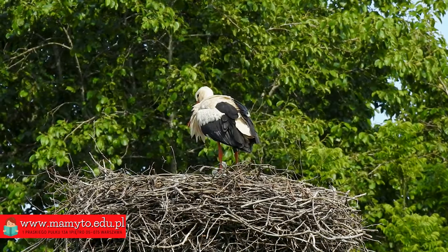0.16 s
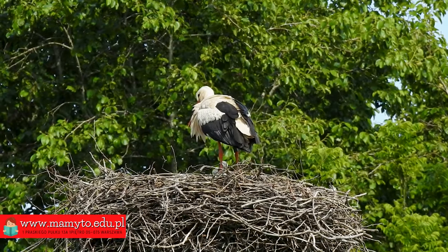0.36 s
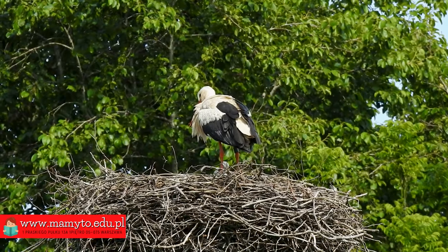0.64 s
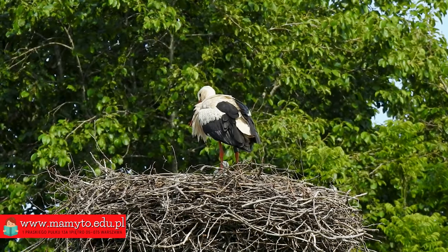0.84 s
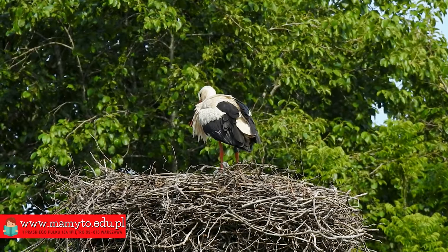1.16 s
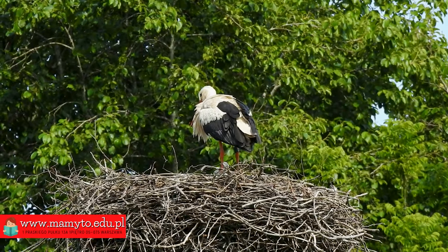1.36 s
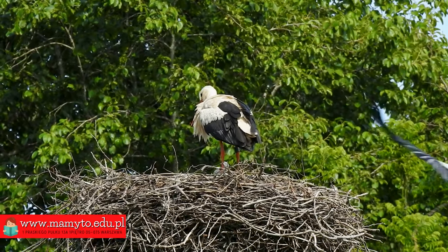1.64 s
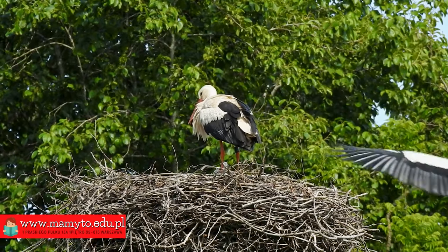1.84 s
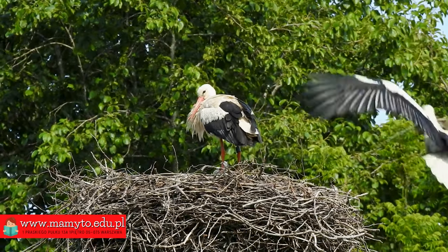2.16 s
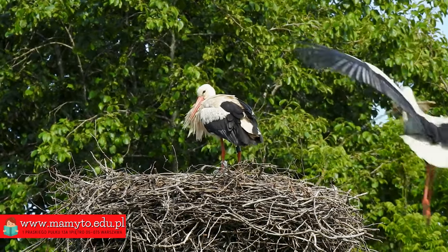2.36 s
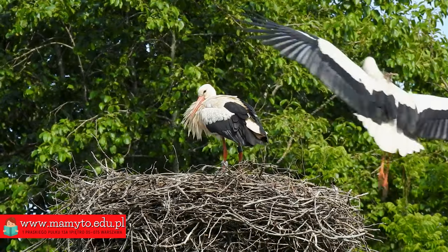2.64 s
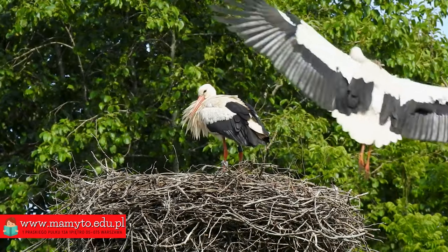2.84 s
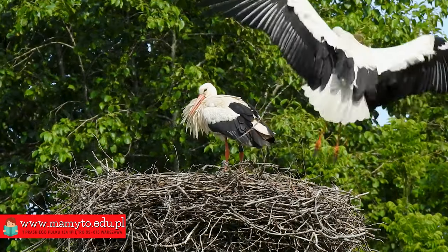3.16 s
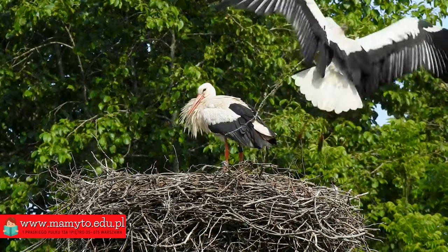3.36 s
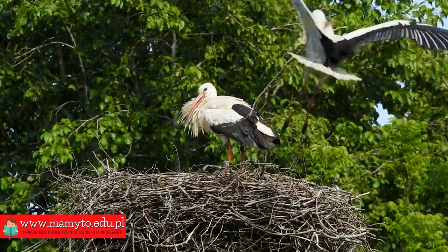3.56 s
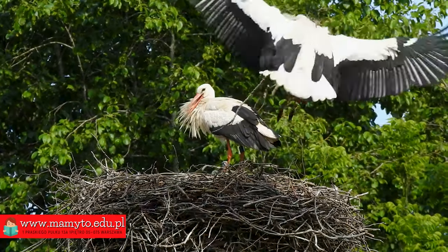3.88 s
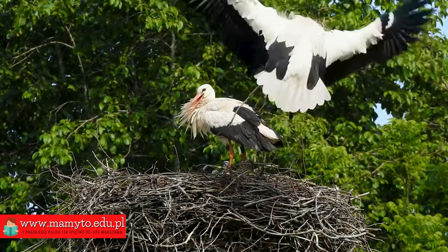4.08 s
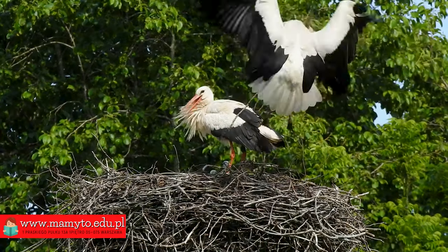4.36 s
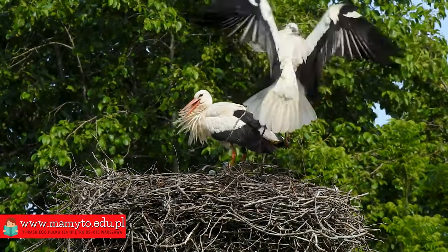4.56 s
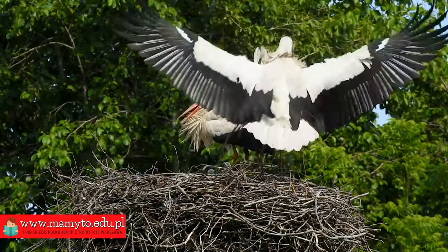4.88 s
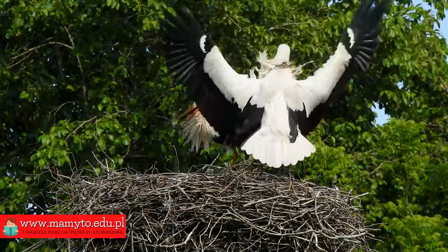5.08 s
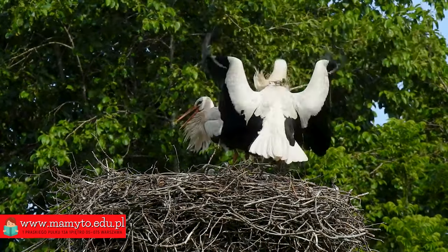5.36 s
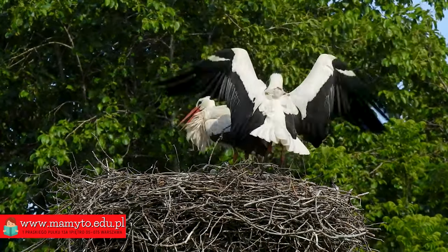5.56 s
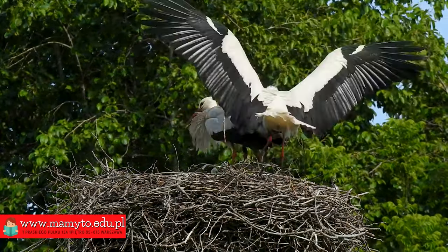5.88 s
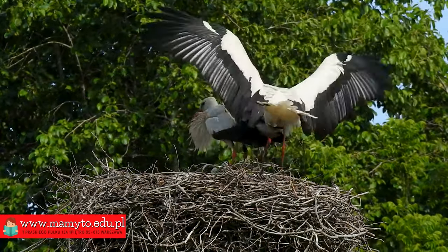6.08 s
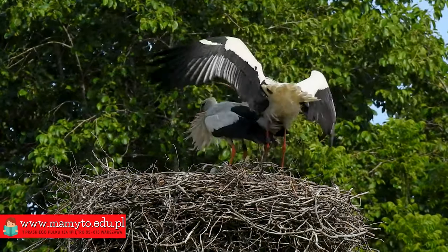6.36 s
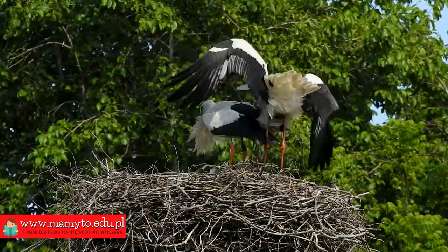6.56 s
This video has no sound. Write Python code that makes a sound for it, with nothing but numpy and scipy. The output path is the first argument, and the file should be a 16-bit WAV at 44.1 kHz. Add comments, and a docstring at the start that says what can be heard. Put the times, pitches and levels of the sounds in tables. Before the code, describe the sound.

Outdoors by a leafy wood, two storks on a stick nest begin bill-clattering almost together, quietly and very fast. The clacks grow louder and settle into a steady hollow rattle, the softer bird slower and out of step. A far dove coos faintly, a tiny bird whistles, and light wind stirs leaves. The louder stork speeds up at the end. The microphone hears both birds centred and fairly clear.

```python
"""Two storks start clattering their bills almost together on a stick nest, each at its own pace.
Every clack rings bill and throat pouch, modelled as resonances that shift as the neck bends.
Wind gusts rumble and leaf noise swells; nest and trees return each clack as scattered noise tails.
From 1.9 s a dove coos far off (gliding sines); a small bird whistles at 2.5 s and again from 4.3 s.
The mate has slowed by then; the lead stork speeds up from 6 s and clatters on to the end."""
import sys
import numpy as np
from scipy import signal
from scipy.fft import rfft, irfft
from scipy.io import wavfile
from scipy.ndimage import uniform_filter1d, minimum_filter1d

SR = 44100
rng = np.random.default_rng(int(sys.argv[2]) if len(sys.argv) > 2 else 0)


def bounce(signal):
    """Save signal as a 16-bit WAV file at the path given by the first command-line argument."""
    frames = np.transpose(np.atleast_2d(signal))
    limited = np.clip(frames, -1, 1)
    pcm = np.round(limited * 32767).astype(np.int16)
    wavfile.write(sys.argv[1], SR, pcm)


N = 296352
TIME = np.arange(N) / SR

# bill and pouch resonances per neck posture: centre_hz, half_power_width_hz, relative_level_db
LEAD_POSTURE_0 = [(704, 148, -12), (944, 130, -10), (1520, 113, 11.5), (2146, 160, 0), (2363, 210, -1),
                  (2830, 510, -10.5), (3680, 280, -17), (4260, 420, -18.5), (4760.0, 750, -25.5),
                  (6980.0, 960.0, -73)]
LEAD_POSTURE_1 = [(690, 125, -13.5), (1050, 110, -17), (1538, 255, -2), (1875, 560, -7), (2362, 133, 3),
                  (2957, 183, -5.5), (3580, 420, -13.5), (4360, 87, -15), (5210, 710, -27.5),
                  (7200, 540, -41)]
LEAD_POSTURE_2 = [(655, 87, -15.5), (1137, 160, -14), (1608, 287, -2), (2190, 180, -21.5), (2375, 143, 0.5),
                  (3074, 120, -7.5), (3927, 150, -16.5), (4680, 140, -22.5), (5570, 860, -32.5),
                  (7400, 330, -42.5)]
LEAD_POSTURE_3 = [(692, 108, -13), (1240, 370, -12.5), (1497, 230, -2), (1702, 165, 5), (2406, 198, 0),
                  (3160, 130, -10.5), (4170, 220, -19.5), (4340, 1120, -25.5), (5780, 260, -30.5),
                  (6800, 300, -48.5)]
LEAD_POSTURE_4 = [(700, 220, -15.5), (1260, 400, -25.5), (1545, 89, 6), (1660, 170, -4), (2345, 170, 0),
                  (2930, 460, -12.5), (3650, 280, -23.5), (4370, 330, -23), (5460, 300, -35),
                  (6800, 300, -41)]
# neck bend: time_s, posture_number
LEAD_NECK = [(1.35, 0), (1.55, .6), (2.0, .85), (3.8, 1.1), (4.1, 1.85), (5.28, 2.1), (5.4, 3),
             (6.42, 3.05), (6.58, 4)]
# first touch in the double contact of the mandibles, per posture: share (0-1, capped at 0.9)
LEAD_TOUCH = [1, 0.35, 0.44, 0.58, 0.71]
# dull knock of the head under the ring, per posture: relative_level_db
LEAD_KNOCK_DB = [-34.5, -28, -25.5, -26.5, -23]
# clatter rate: time_s, clacks_per_s
LEAD_PACE = [(0.37, 12.791), (0.66, 12.411), (1.26, 10.822), (1.54, 8.987), (2.24, 8.61), (2.36, 8.969),
             (2.81, 8.722), (2.87, 8.885), (4.35, 8.972), (4.86, 8.697), (6.01, 9.041), (6.24, 12.521),
             (6.28, 12.11), (6.55, 13.425)]
# snap force: time_s, direct_level_db (rms over 10 ms), hardness_db_per_octave
LEAD_EFFORT = [(0.1, -33.5, -2.5), (0.62, -26.5, -2.5), (0.82, -32.5, -5), (0.91, -25, -3),
               (1.45, -22, -1.4), (1.77, -26.5, -4), (1.9, -21, -2.3), (2.999, -21.5, -1),
               (3.85, -18.5, -0.5), (4.3, -19.2, -1.5), (4.599, -17, 1), (5.5, -14.5, 1.17),
               (6.15, -18, -1.46), (6.58, -18.5, 2), (6.72, -19.5, 1)]
LEAD_START_S, LEAD_STOP_S = 0.0336, 6.7


def lead_stork():
    """The louder bird: bill impacts come quick, then steady and hard, then quick again."""
    out = np.zeros(N)
    postures = [LEAD_POSTURE_0, LEAD_POSTURE_1, LEAD_POSTURE_2, LEAD_POSTURE_3, LEAD_POSTURE_4]
    clacks = clatter(LEAD_START_S, LEAD_STOP_S, LEAD_PACE, LEAD_EFFORT,
                     uneven_db=0.0, uneven_hardness_db=0.65)
    for time_s, level_db, hardness_db in clacks:
        posture = at(time_s, LEAD_NECK)
        sound = snap(postures, LEAD_TOUCH, LEAD_KNOCK_DB, posture, hardness_db, rebound_db=-12.5)
        add(out, time_s, undb(level_db) * twigs(sound, level_db=-13.5, start_s=0.0047, t60_s=0.1))
    return out


# bill and pouch resonances per neck posture: centre_hz, half_power_width_hz, relative_level_db
MATE_POSTURE_0 = [(903, 265, -12.5), (1576, 86, 8), (2450, 190, 1.5), (2474, 184, -7.5), (3450, 320, -14.5),
                  (4170, 340, -13), (5220, 310, -27), (6920.0, 930.0, -83)]
MATE_POSTURE_1 = [(754, 99, -14.5), (1620, 210.0, -9.5), (2164, 204, -1.5), (3030, 88, -3.5),
                  (3714, 75, -5.5), (4395, 176, -6.5), (4860, 320, -21.5), (7100, 480, -32.5)]
MATE_POSTURE_2 = [(747, 155, -11), (1666, 110, 4), (2050, 320, 4), (2600, 800, -1.5), (3560, 200, -1),
                  (4350, 50, -3.5), (4610, 550, -14), (7400.0, 870.0, -51.5)]
MATE_POSTURE_3 = [(800, 96, -6.5), (1670, 180, 8.5), (1930, 280, 10.5), (2500, 510, 3), (3400, 300, -5),
                  (4310, 200, -14), (4700, 550, -19), (7400, 870, -37)]
# neck bend: time_s, posture_number
MATE_NECK = [(1.87, 0.33), (2.25, 1.03), (3.9, 1.53), (4.8, 2), (5.6, 2.07), (6.0, 2.5)]
# first touch in the double contact of the mandibles, per posture: share (0-1)
MATE_TOUCH = [0.22, 0.71, 0.52, 0.51]
# dull knock of the head under the ring, per posture: relative_level_db
MATE_KNOCK_DB = [-36.5, -38, -26.5, -35]
# clatter rate, slowing and staying slow: time_s, clacks_per_s
MATE_PACE = [(0.18, 10.403), (0.27, 10.786), (1.15, 10.246), (1.57, 9.573), (1.66, 7.921), (1.85, 7.326),
             (3.38, 6.648), (3.74, 6.994), (3.87, 6.658), (4.18, 6.751), (4.32, 6.398), (4.46, 6.773),
             (5.26, 6.422), (6.3, 6.911)]
# snap force: time_s, mean_direct_level_db (rms over 10 ms), hardness_db_per_octave
MATE_EFFORT = [(0.15, -38.5, -2.2), (0.6, -31, -2), (1.951, -27.5, 0.1), (2.15, -28.5, -2.5),
               (2.7, -28.5, -3.5), (3.5, -24.5, -0.6), (4.4, -26, -2.2), (5.1, -21, -2.3), (5.8, -23, -1.5),
               (6.0, -31.5, -3.5), (6.44, -29, -4.5)]
# bounce off the nest as the head moves: time_s, lag_s, level_re_direct_db
MATE_BOUNCE = [(0, 0.0048, -8.5), (1.9, 0.0088, -7.5), (2.15, 0.0041, -6), (2.9, 0.0076, -9.5),
               (4.3, .0046, -10), (5.1, 0.007, -8), (5.7, 0.0053, -14.5), (6.0, 0.005, -19)]
MATE_START_S, MATE_STOP_S = 0.078, 6.5


def mate_stork():
    """The slower bird: each bill impact also bounces once off the nest, as a delayed copy."""
    out = np.zeros(N)
    postures = [MATE_POSTURE_0, MATE_POSTURE_1, MATE_POSTURE_2, MATE_POSTURE_3]
    bounce_times_s, lags_s, bounces_db = np.transpose(MATE_BOUNCE)
    clacks = clatter(MATE_START_S, MATE_STOP_S, MATE_PACE, MATE_EFFORT,
                     uneven_db=2.1, uneven_hardness_db=0.5)
    for time_s, level_db, hardness_db in clacks:
        posture = at(time_s, MATE_NECK)
        sound = snap(postures, MATE_TOUCH, MATE_KNOCK_DB, posture, hardness_db, rebound_db=-18.5)
        sound = undb(level_db) * sound
        add(out, time_s, twigs(sound, level_db=-13.0, start_s=0.0035, t60_s=0.1))
        lag_s = np.interp(time_s, bounce_times_s, lags_s)
        bounce_db = np.interp(time_s, bounce_times_s, bounces_db)
        add(out, time_s + lag_s, undb(bounce_db) * sound)
    return out


def clatter(start_s, stop_s, pace, effort, uneven_db, uneven_hardness_db):
    """Clacks (time_s, level_db, hardness_db) on a bird's pace and effort, with random force."""
    times_s = [start_s]
    while (next_s := times_s[-1] + 1 / at(times_s[-1], pace)) < stop_s:
        times_s.append(next_s)
    effort_times_s, level_db, hardness_db = np.transpose(effort)
    chance = rng.standard_normal((len(times_s), 2))
    levels_db = np.interp(times_s, effort_times_s, level_db) + uneven_db * chance[:, 0]
    hardnesses_db = np.interp(times_s, effort_times_s, hardness_db) + uneven_hardness_db * chance[:, 1]
    return zip(times_s, levels_db, hardnesses_db)


def snap(postures, touches, knocks_db, posture, hardness_db, rebound_db, spread=0.017, uneven_db=0.37):
    """One clack in a posture; the strike spot on the bill varies, so its resonances scatter."""
    modes = blend(postures, posture)
    chance = rng.standard_normal((len(modes), 2))
    modes[:, 0] *= 1 + spread * chance[:, 0]
    modes[:, 2] += uneven_db * chance[:, 1]
    return clack(modes, hardness_db, blend(touches, posture), blend(knocks_db, posture), rebound_db)


def blend(values, posture):
    """Value part-way between two neighbouring postures."""
    distance = np.abs(np.arange(len(values)) - np.clip(posture, 0, len(values) - 1))
    return np.tensordot(np.maximum(1 - distance, 0), np.array(values, float), axes=1)


SIZE = 2048  # samples per clack
GRAZE_S, GRAZE_SHARE = 0.0006, 0.29  # bill edges graze just before they close


def clack(modes, hardness_db, touch, knock_db, rebound_db, gap_s=0.00135, rebound_s=0.002637,
          knock_hz=430, bass_db=-17, lag_s=.009, lag_hz=580):
    """The mandibles graze, touch, slam shut and rebound, ringing bill and pouch; 10 ms rms 1."""
    f = np.maximum(np.fft.rfftfreq(SIZE, 1 / SR), 1)

    def delayed(seconds):
        return np.exp(-2j * np.pi * f * seconds)

    power = undb(2 * knock_db) / (1 + (f / knock_hz) ** 4)
    for centre_hz, width_hz, level_db in modes:
        detune = (f * f - centre_hz * centre_hz) / (f * width_hz)
        power = power + undb(2 * level_db) / (1 + (np.sqrt(2) - 1) * detune ** 2) ** 2
    # a thin bill radiates hardly any bass, only a faint thump
    thump = undb(bass_db) * (1 + 1.3 / (1 + (f / 140) ** 4))
    radiation = thump + 1 / np.sqrt(1 + (372 / f) ** 28)
    air = 1 / np.sqrt(1 + (f / 9300) ** 10)  # distance dulls the very top
    tilt = undb(hardness_db * np.log2(np.maximum(f, 400) / 2000))
    ring = causal(np.sqrt(power) * air * radiation * tilt)

    gap_s, rebound_s = np.array([gap_s, rebound_s]) * (1 + [.03, .13] * rng.standard_normal(2))
    contacts = double_contact(touch, delayed(gap_s))
    contacts = contacts * (1 + undb(rebound_db) * delayed(rebound_s))
    contacts = contacts * double_contact(GRAZE_SHARE, delayed(GRAZE_S))
    # low notes come late, so each clack drops in pitch: a hollow "tok"
    delay_s = lag_s / (1 + (f / lag_hz) ** 4)
    drop = np.exp(-2j * np.pi * np.cumsum(delay_s) * SR / SIZE)
    fade = np.hanning(2 * SIZE)[SIZE:]
    return unit(irfft(ring * contacts * drop) * fade) * np.sqrt(SR / 100)


def double_contact(share, later):
    """Two-stage contact as an all-pass: spreads the blow in time, keeps its spectrum."""
    share = np.clip(share, 0, .9)
    return (share + later) / (1 + share * later)


def causal(gain):
    """Minimum-phase response with this gain: it rings only after the blow."""
    cepstrum = irfft(np.log(gain + 1e-7))
    cepstrum[1:SIZE // 2] *= 2
    cepstrum[SIZE // 2 + 1:] = 0
    return np.exp(rfft(cepstrum))


def twigs(x, level_db, start_s, t60_s):
    """Nest sticks add a short dense scatter to the direct clack."""
    paths = undb(level_db) * scatter(start_s, t60_s, size=2 * SIZE)
    paths[0] = 1  # direct sound
    return signal.fftconvolve(x, paths)


# left-right difference of the nest scatter: frequency_hz, level_re_clack_db
NEST_WIDTH = [(300, -31.5), (700, -34.5), (1500, -30.5), (2500, -24), (4500, -17.5), (9000, -23)]


def nest_width(x, start_s=0.0016, t60_s=.05):
    """Sticks scatter each clack differently left and right: opposite-sign side signal."""
    side = signal.fftconvolve(colour(x, NEST_WIDTH), scatter(start_s, t60_s, size=2 * SIZE))[:N]
    return side * np.array([[1], [-1]])


# spectrum of the foliage tail: frequency_hz, gain_db (before the wet level)
TREES_COLOUR = [(200, -5), (450, -19.5), (750, -17.5), (1100, -9.5), (1500, -14), (1800, -10.5),
                (2400, -12), (3200, -11), (5000, 4), (9000, 0.5)]


def trees(x, wet_db=-19, side_db=-4, trunk_s=0.039, trunk_db=-28, far_s=0.099, far_db=-31, count=4):
    """Foliage returns a soft tail that shifts as heads turn; the wood's edge adds two echoes."""
    out = np.zeros((2, N))
    facing = np.array([walk(5.5) for _ in range(count)])
    shares = facing / np.sqrt(np.sum(facing ** 2, axis=0))
    for share in shares:
        tails = [scatter(.008, .45, size=SR) for _ in range(2)]
        mid, side = (colour(tail, TREES_COLOUR) * undb(wet_db) for tail in tails)
        out += [signal.fftconvolve(x * share, mid + sign * undb(side_db) * side)[:N] for sign in (1, -1)]
    for channel in out:
        add(channel, trunk_s, undb(trunk_db) * x)
        add(channel, far_s, undb(far_db) * x)
    return out


# dove notes: start_s, length_s, pitch_hz (approached from below), peak_db (before the wood's blur)
COOS = [(1.88, 0.65, 571.5, -65.5), (2.888, 0.22, 580, -54), (3.05, 0.071, 565, -53.5),
        (3.292, 0.071, 571.6, -51), (3.495, 0.059, 574, -52), (3.735, 0.16, 575, -58)]
# small bird: start_s, length_s, start_hz, end_hz (before waver), peak_db (before the wood's blur)
WHISTLES = [(2.497, 0.11, 4880, 4800, -52.5), (2.602, 0.13, 4840, 4410, -57.5),
            (4.3, 0.064, 5500, 5710, -50.5), (4.49, 0.14, 4900, 4900, -51.5),
            (4.569, .13, 5170, 5120, -54.5), (4.698, 0.17, 5140, 5350, -52),
            (4.85, 0.098, 5100, 4850, -53.5)]


def far_birds(scoop=0.067, waver=0.026):
    """Sines for dove notes scooping up and thin wavering whistles, blurred by the wood."""
    out = np.zeros(N)
    wobble = 1 + waver * walk(90)
    for start_s, length_s, pitch_hz, peak_db in COOS:
        u = np.linspace(0, 1, int(length_s * SR))
        glide_hz = pitch_hz * (1 - scoop * np.exp(-4 * u))
        swell = np.sqrt(np.abs(np.sin(np.pi * u)))
        add(out, start_s, undb(peak_db) * swell * tone(glide_hz))
    for start_s, length_s, start_hz, end_hz, peak_db in WHISTLES:
        u = np.linspace(0, 1, int(length_s * SR))
        glide_hz = (start_hz + (end_hz - start_hz) * u) * wobble[int(start_s * SR):][:len(u)]
        add(out, start_s, undb(peak_db) * np.sin(np.pi * u) * tone(glide_hz))
    blur = signal.fftconvolve(out, scatter(.015, .4, size=SR))[:N]
    return undb(-2) * out + undb(-3) * blur


def tone(pitch_hz):
    """Sine whose phase accumulates a moving pitch."""
    return np.sin(2 * np.pi * np.cumsum(pitch_hz) / SR)


# leaves and distant air: time_s, level_db (before a random wander)
AIR_LEVEL = [(0, -61.5), (1, -53.5), (2, -50), (4, -48.5), (6.72, -47.5)]
# noise spectra, relative: frequency_hz, density_db_per_hz
WIND_COLOUR = [(8, -8), (20, 0.5), (33, 0.5), (50, -25), (80, -25.5), (150, -35), (400, -64.5)]
AIR_COLOUR = [(30, -2.5), (100, -7.5), (200, -9), (330, -13), (480, -4), (720, 1.5), (1100, -1), (1800, 11),
              (3000, -1), (4800, -11.5), (6300, -18.5), (10000, -27)]


def breeze(side_db=-19):
    """Wind rumbles at the microphone and stirs the leaves: two coloured noises."""
    gusts = undb(wind_db())
    leaves = undb(curve(AIR_LEVEL) + walk(12))
    mid, side = (gusts * noise(WIND_COLOUR) + leaves * noise(AIR_COLOUR) for _ in range(2))
    return mid + undb(side_db) * side * np.array([[1], [-1]])


# gusts at the microphone: start_s, length_s, level_db
GUSTS = [(0.25, 1.05, -57), (2.03, 1.23, -55.5), (3.95, 0.8, -54), (6.547, 0.3, -60)]
CALM_DB, GUST_RISE_S, GUST_FALL_S = -71.5, 0.2, 0.25


def wind_db():
    """Wind level: each gust rises out of the calm, holds and falls back."""
    level_db = CALM_DB
    for start_s, length_s, gust_db in GUSTS:
        end_s = start_s + length_s
        shape = curve([(start_s - GUST_RISE_S, 0), (start_s, 1), (end_s, 1), (end_s + GUST_FALL_S, 0)])
        level_db = level_db + (gust_db - CALM_DB) * shape
    return level_db


def scatter(start_s, t60_s, size):
    """Dense small reflections as noise: set in after start_s, die away; energy 1."""
    t = np.arange(size) / SR - start_s
    onset = np.clip(2 * t / start_s, 0, 1)
    return unit(rng.standard_normal(size) * onset * undb(-60 * np.maximum(t, 0) / t60_s))


def noise(points):
    """Coloured noise of rms 1."""
    x = colour(rng.standard_normal(N), points)
    return x / x.std()


def colour(x, points):
    """Filter by a spectrum of (frequency_hz, gain_db) points."""
    hz, db = np.transpose(points)
    f = np.maximum(np.fft.rfftfreq(len(x), 1 / SR), 1)
    return irfft(rfft(x) * undb(np.interp(np.log(f), np.log(hz), db)), len(x))


def walk(rate_hz):
    """Slow random wander, spread near 1."""
    k = int(SR / rate_hz)
    steps = np.repeat(rng.standard_normal(N // k + 1), k)
    return 1.3 * uniform_filter1d(uniform_filter1d(steps, k), k)[:N]


def at(time_s, rows):
    """Value at a time, from rows of (time_s, value) joined by straight lines."""
    return np.interp(time_s, *np.transpose(rows))


def curve(rows):
    """Rows of (time_s, value) as a signal over the whole scene."""
    return at(TIME, rows)


def undb(db):
    """Decibels to gain."""
    return 10 ** (np.asarray(db) / 20)


def unit(x):
    """Scale to energy 1."""
    return x / np.sqrt(np.sum(x ** 2))


def add(out, start_s, x):
    """Mix a sound in at start_s."""
    i = max(int(start_s * SR), 0)
    out[i:i + len(x)] += x[:max(len(out) - i, 0)]


def scene():
    """Both storks straight ahead on their nest, the wood around them."""
    storks = lead_stork() + mate_stork()
    return storks + trees(storks) + far_birds() + breeze() + nest_width(storks)


def record(dry):
    """A fast limiter levels the hardest clacks; a steep low-pass cuts the top."""
    ceiling, window_samples, top_hz = .44, 45, 10000
    gain = 1 / np.maximum(np.abs(dry).max(axis=0) / ceiling, 1)
    limited = dry * uniform_filter1d(minimum_filter1d(gain, window_samples), window_samples)
    return signal.sosfilt(signal.ellip(8, .2, 70, top_hz, fs=SR, output="sos"), limited)


dry = scene()
out = record(dry)
bounce(out)
```